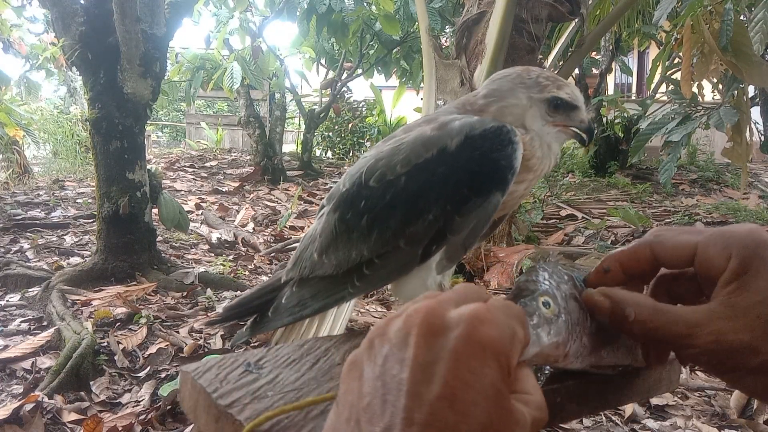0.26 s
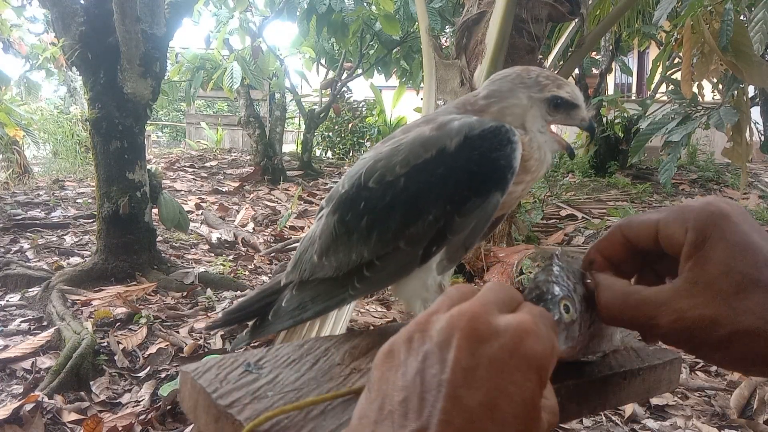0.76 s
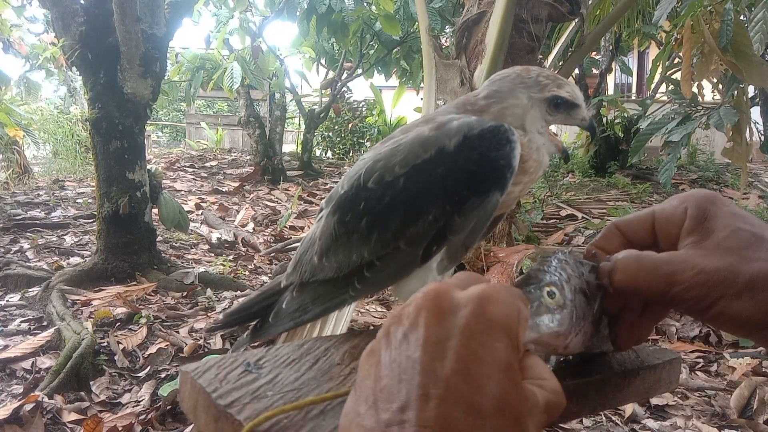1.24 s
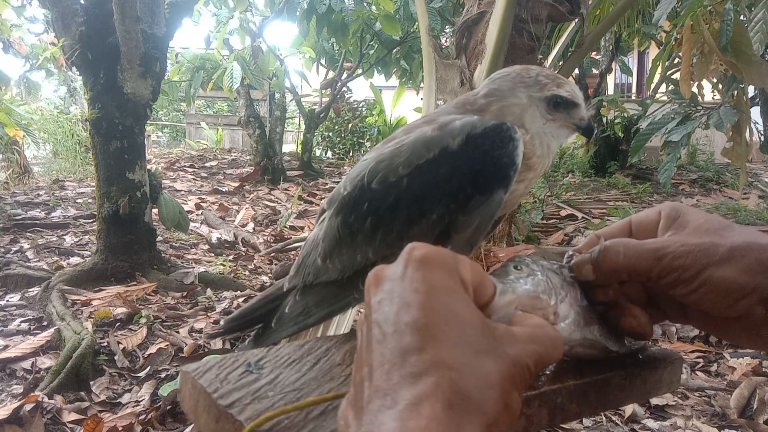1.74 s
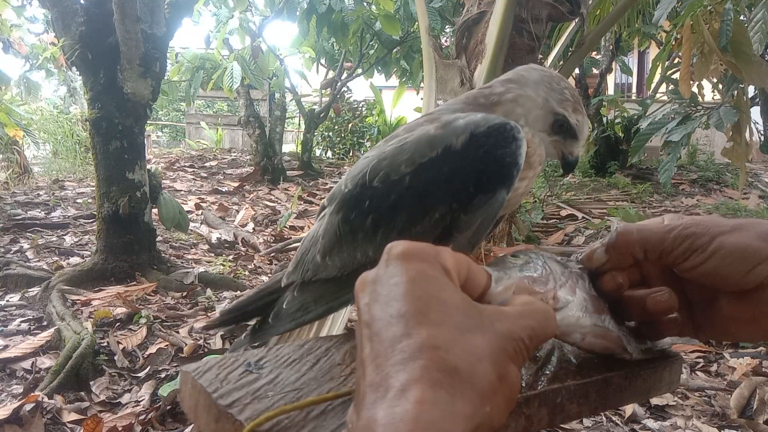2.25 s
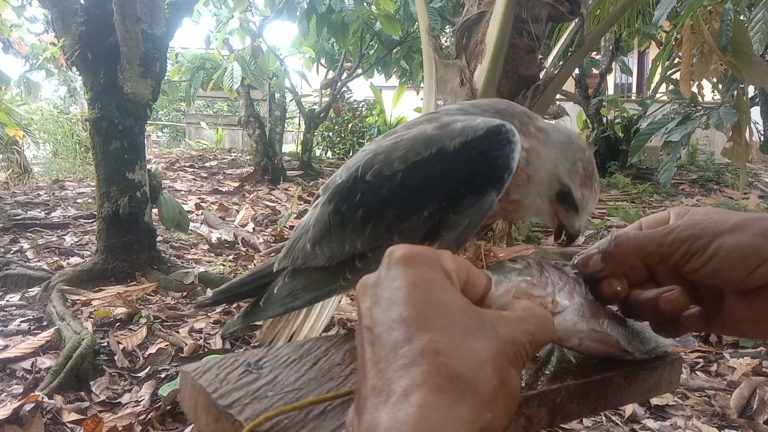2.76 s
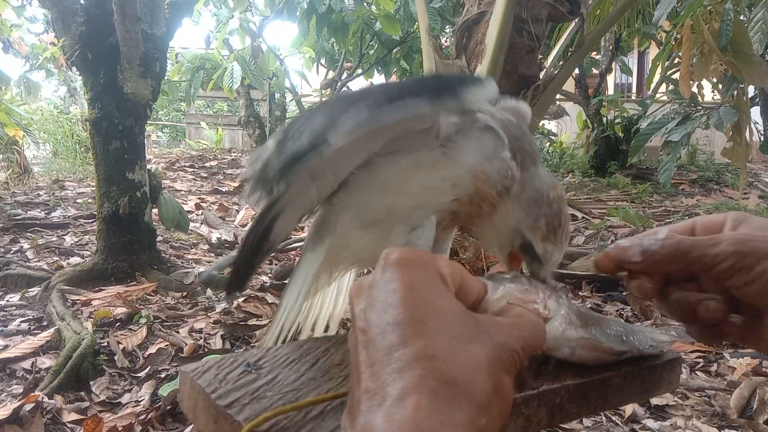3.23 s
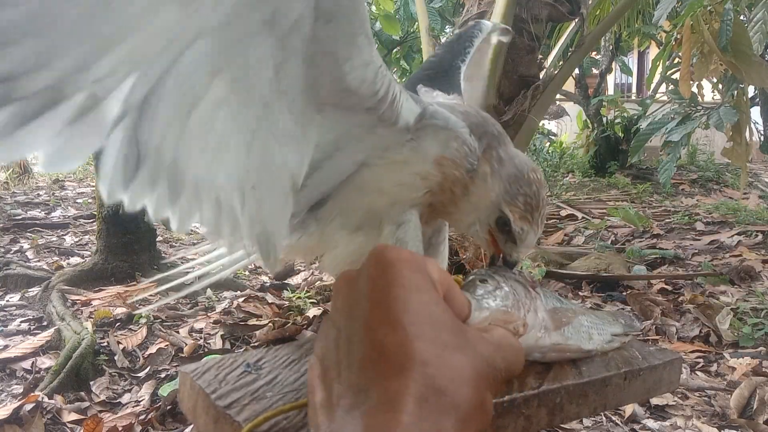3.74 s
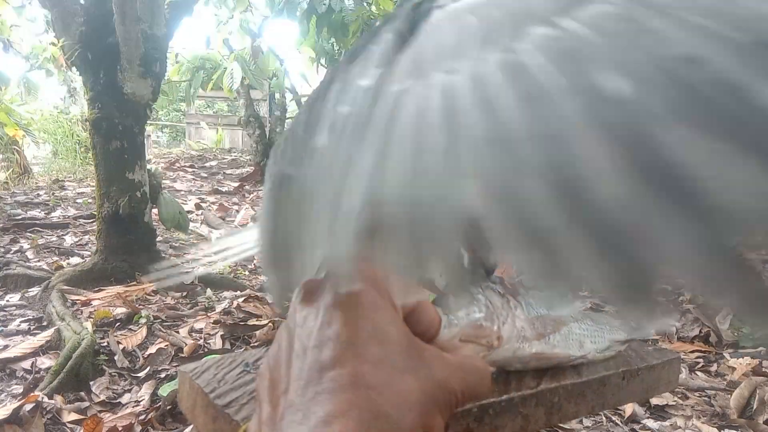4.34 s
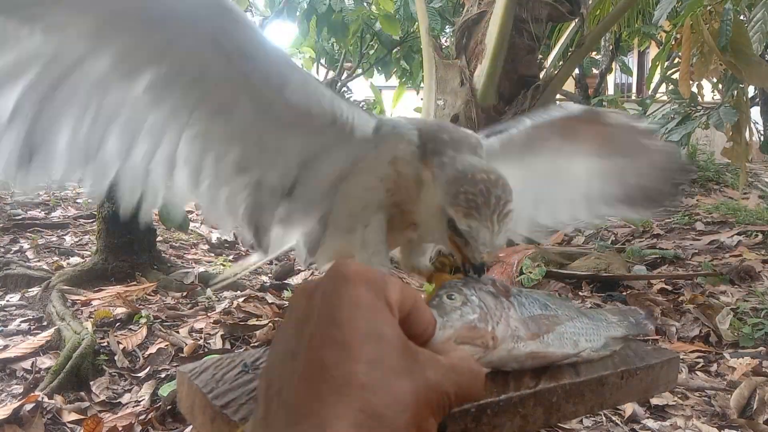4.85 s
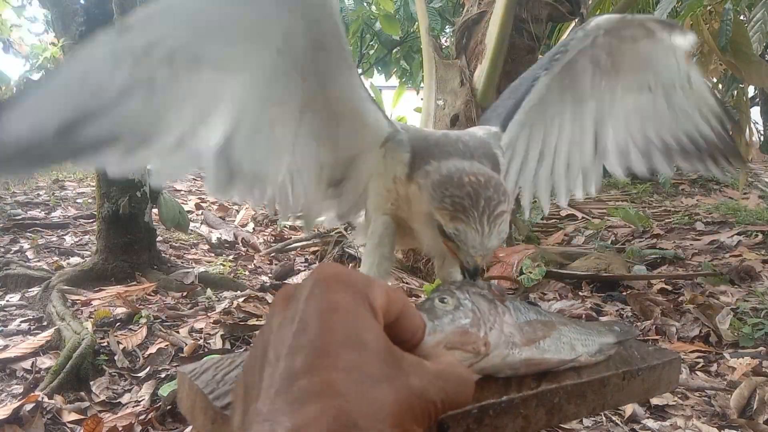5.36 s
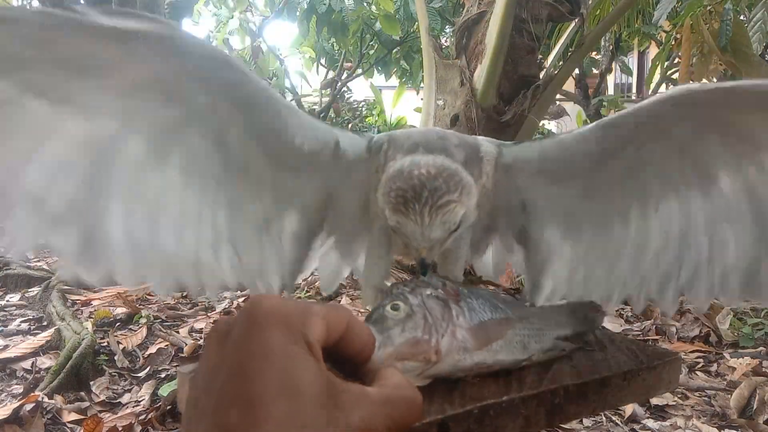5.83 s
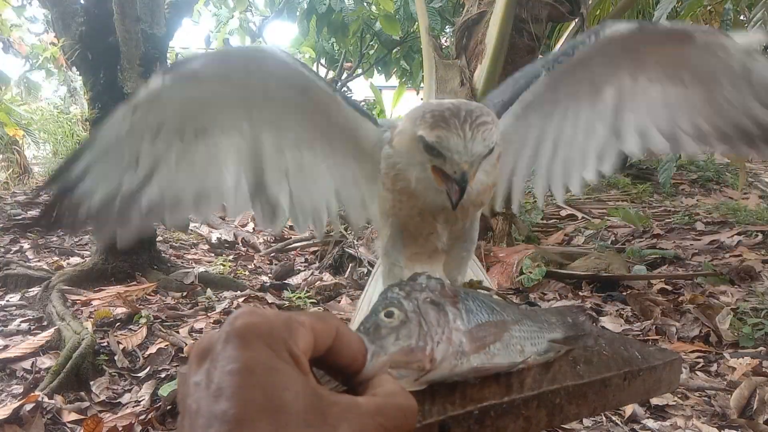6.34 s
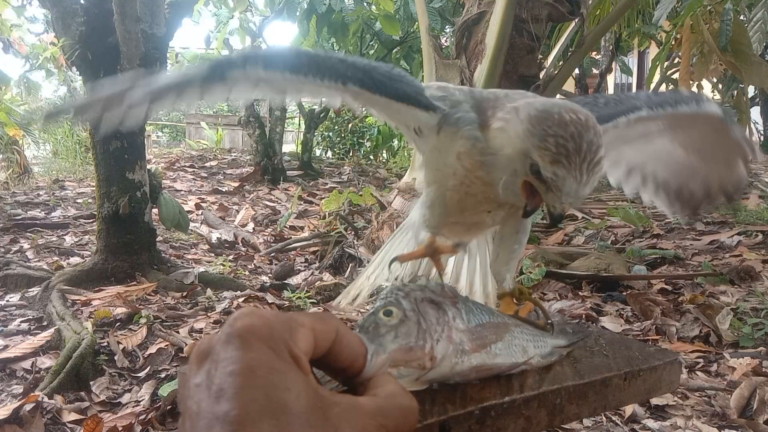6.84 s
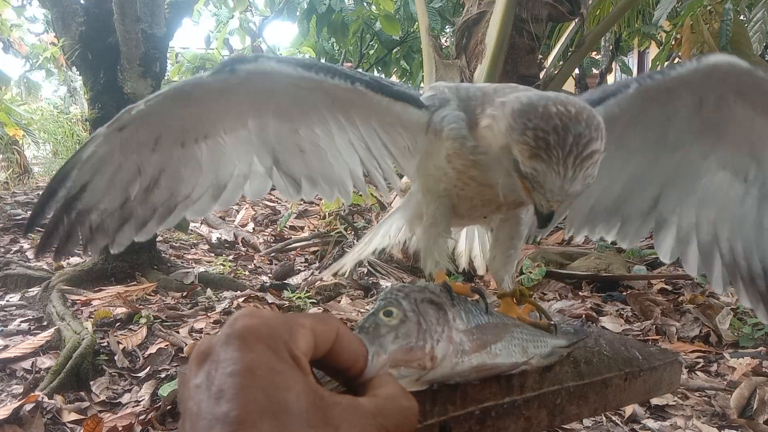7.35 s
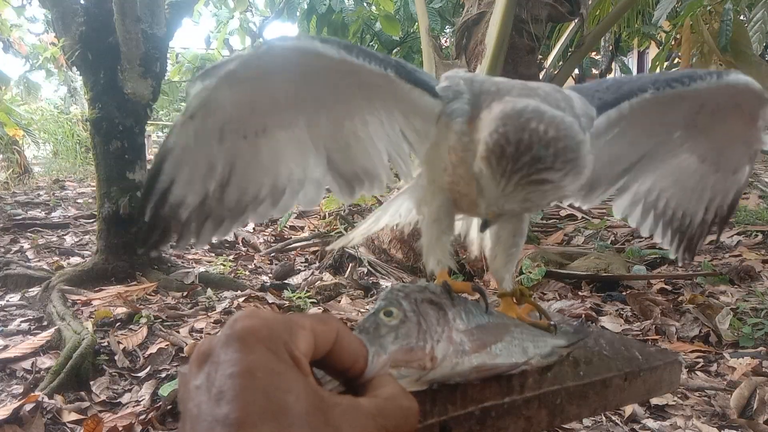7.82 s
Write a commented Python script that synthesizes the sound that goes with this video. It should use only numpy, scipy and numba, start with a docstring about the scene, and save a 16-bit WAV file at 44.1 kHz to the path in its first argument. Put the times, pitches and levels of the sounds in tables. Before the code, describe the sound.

A young bird of prey gives four long, shrill, rasping screams close by, over a faint fading engine and insects in a garden.

```python
"""Four long, rasping screams of a young bird of prey, a metre from a phone in a garden.
Uneven slaps and turbulence in its syrinx ring throat and beak resonances; thin wavering tones
break through. Behind it an idling engine dies away, a rumble, a broad hiss and insects swell
and fade, and a vehicle draws near at the end."""
import sys
import numpy as np
from scipy import signal
from scipy.fft import rfft, irfft
from scipy.io import wavfile
from scipy.ndimage import uniform_filter1d, minimum_filter1d
from numba import njit

SR = 44100
rng = np.random.default_rng(int(sys.argv[2]) if len(sys.argv) > 2 else 0)


def to_wav(sig):
    """Store sig (one row per channel, or 1-D mono) as 16-bit WAV at the path in sys.argv[1].

    Samples outside -1..1 are clipped; the rate is SR.
    """
    pcm = np.clip(np.atleast_2d(sig), -1, 1) * 32767
    pcm = np.round(pcm).astype(np.int16)
    wavfile.write(sys.argv[1], SR, pcm.T)  # frames by channels


N = 356636
TIME_S = np.arange(N) / SR

# course shared by rumble and engine: (time [s], level [dB])
RUMBLE_LEVEL = [(0.0, -42.5), (0.3, -40.5), (0.7, -50.5), (1.64, -46.5), (1.77, -37), (2.46, -38),
                (2.9, -48), (3.5, -54.5), (4.2, -53.5), (4.35, -66), (6.5, -68), (7.2, -62)]


def undb(db):
    return 10 ** (np.asarray(db) / 20)


def unit(x):
    return x / np.sqrt(np.mean(x ** 2))


def bump(at_s, width_s):
    return np.exp(-((TIME_S - at_s) / width_s) ** 2)


def curves(rows):
    """Columns interpolated over the first (time [s]), one value a sample."""
    times_s, *columns = np.transpose(rows)
    return [np.interp(TIME_S, times_s, column) for column in columns]


def walk(rate_hz):
    """Random steps, smoothed; RMS 1."""
    hold = int(SR / rate_hz)
    steps = np.repeat(rng.standard_normal(N // hold + 1), hold)
    return unit(uniform_filter1d(uniform_filter1d(steps, hold), hold)[:N])


@njit
def bandpass(x, hz, width_hz):
    """State-variable filter with moving centre and width; gain 1 at the centre."""
    y, band, low = np.empty(len(x)), 0., 0.
    for i in range(len(x)):
        g, damping = np.tan(np.pi * hz[i] / SR), width_hz[i] / hz[i]
        v = (band + g * (x[i] - low)) / (1 + g * (g + damping))
        band, low, y[i] = 2 * v - band, low + 2 * g * v, damping * v
    return y


def resonance(x, hz, width_hz, stages=2):
    """Cascaded band-passes, levelled to RMS 1 over 1/30 s."""
    for _ in range(stages):
        x = bandpass(x, hz * np.ones(N), width_hz * np.ones(N))
    return x / np.sqrt(uniform_filter1d(x ** 2, SR // 30) + 1e-9)


def coloured_noise(spectrum, flicker_db):
    """Flickering noise shaped by (frequency [Hz], level [dB]) points; RMS 1."""
    hz, db = np.transpose(spectrum)
    bins_hz = np.arange(N // 2 + 1) * SR / N + 1
    gain = undb(np.interp(np.log(bins_hz), np.log(hz), db))
    noise = irfft(rfft(rng.standard_normal(N)) * gain, N)
    return unit(noise * undb(flicker_db * walk(12)))


def syrinx(rate_hz, slap_share):
    """Uneven membrane slaps, each with a decaying gush of turbulence."""
    cycles = np.cumsum(rate_hz * np.clip(1 + .3 * walk(500), .1, 3)) / SR
    slaps = np.diff(np.floor(cycles), prepend=0) * undb(.4 * rng.standard_normal(N))
    gush = undb(-8 * (cycles % 1)) * rng.standard_normal(N)
    return undb(walk(70)) * (np.sqrt(slap_share) * unit(slaps) + np.sqrt(1 - slap_share) * unit(gush))


def rasp(beak_hz=4684, attack_s=.01, release_s=.024, snap_s=.018, snap_depth=.22, drift_per_db=.015):
    """The syrinx rings throat, beak and chest; resonances drop as the throat snaps shut."""
    # per call: (time [s], low resonance [Hz], throat resonance [Hz], throat level [dB],
    # low re throat [dB], brightness [dB])
    calls = [
        [(0.0, 1090, 2850, -36, 7.5, 17), (0.17, 1240, 2830, -28.5, 9, 12), (0.29, 1220, 2700, -29.5, 8.5, 17),
         (0.36, 1450, 2700, -14.5, -5, -2), (0.45, 1560, 3000, -11, -12.5, -4),
         (0.63, 1590, 3180, -13.5, -14.5, 1.5), (1.0, 1650, 3250, -13.5, -17.5, -1.5),
         (1.41, 1790, 3350, -15, -16, 1.5), (1.655, 1770, 3360, -17, -15, 5)],
        [(2.32, 1120, 3170, -45, 18, 1), (2.55, 1445, 3000, -30, 16.5, 19), (2.7, 1770, 3270, -16.5, -5, -6),
         (2.85, 1670, 3070, -21, -1.5, 0), (2.98, 1620, 3670, -16.5, -15.5, -30),
         (3.13, 1610, 2983, -24, -5.5, 8), (3.29, 1920, 3630, -19, -8, 0), (3.39, 1700, 3310, -27.5, -11.5, 3),
         (3.65, 2000, 2700, -25, -8.5, 12.5), (3.965, 2120, 3070, -17.5, -6.5, 7.5)],
        [(4.435, 1790, 3160, -24.5, -11, -21), (4.53, 1760, 3400, -21.5, -9.5, -11),
         (4.66, 2210, 2970, -16.5, -11.5, -11), (5.1, 2320, 2780, -20.5, -12.5, -2.5),
         (5.392, 2120, 2830, -22, -7.5, -0.5)],
        [(5.935, 1560, 2880, -20.5, -7.5, -1.5), (6.03, 1460, 2790, -20, -5, 2),
         (6.3, 2000, 3540, -17.5, -10.5, 5.5), (6.47, 1650, 3430, -17, -12.5, 5.5),
         (6.66, 2090, 4210, -17.5, -12.5, 2.5), (6.82, 1950, 4200, -15, -15.5, 0),
         (7.125, 2000, 4140, -12.5, -23.5, -10.5)],
    ]
    # per call: (slap rate [Hz], slap share [0-1], patchiness [dB],
    # widths of low, throat, beak, upper beak [Hz])
    textures = [(440, .7, .8, 1000, 1150, 1300, 1900), (400, .45, 2, 500, 900, 1450, 1900),
                (380, .3, 2.5, 1000, 1500, 1300, 1500), (600, .55, 1.4, 750, 1250, 1300, 1000)]
    # per call: (upper beak [Hz], beak, upper beak, air re throat [dB], chest re low [dB])
    colours = [(5770, -22.5, -11.5, -35.5, -18.5), (5300, -7.5, -9, -40.5, -18),
               (6090, -1.5, -1.5, -20, -17), (5790, -2, -2, -27, -15)]
    # brief beak boosts: (time [s], beak [dB], upper beak [dB], width [s])
    flares = [(2.98, 11, -28, 0.13), (3.285, 7, 8.5, 0.052), (3.89, 4, 4.5, 0.23), (5.988, 1.5, 1, 0.057)]
    # breath bands: (centre [Hz], width [Hz], level [dB])
    air_bands = [(8600, 2900, -22.5), (12690, 6400, 22.5)]
    low_hz, throat_hz, throat_db, low_db, bright_db = curves(np.concatenate(calls))
    held = [(call[end][0], *texture, *colour)
            for call, texture, colour in zip(calls, textures, colours) for end in (0, -1)]
    rate_hz, share, patchy_db, *widths_hz, upper_hz, beak_db, upper_db, air_db, chest_db = curves(held)
    flare_db = sum(np.outer(db, bump(at_s, width_s)) for at_s, *db, width_s in flares)
    beak_db += .1 * bright_db + flare_db[0]
    upper_db += .54 * bright_db + flare_db[1]
    centres_hz, levels_db = (low_hz, throat_hz, beak_hz, upper_hz), (low_db, 0, beak_db, upper_db)
    snap = 1 - snap_depth * sum(np.exp(-np.abs(TIME_S - call[-1][0]) / snap_s) for call in calls)
    source = syrinx(rate_hz, share)
    voice = 0
    for hz, width_hz, db in zip(centres_hz, widths_hz, levels_db):
        gain = undb(db + patchy_db * walk(14))
        drift = 1 + drift_per_db * patchy_db * walk(10)
        voice += gain * resonance(source, hz * snap * drift, width_hz, stages=3)
    voice += undb(low_db + chest_db) * resonance(source, hz=1037, width_hz=590, stages=3)
    air = sum(undb(db) * resonance(source, hz, width_hz) for hz, width_hz, db in air_bands)
    voice += undb(air_db + bright_db) * unit(air)
    gate = sum(np.minimum((TIME_S - call[0][0]) / attack_s, (call[-1][0] - TIME_S) / release_s).clip(0, 1)
               for call in calls)
    return voice * undb(throat_db) * gate


def whistles():
    """Self-sustained syrinx tones; pitch and level shake, more so when rough."""
    # per tone: ((roughness [0-1], partials [dB]), rows of (time [s], pitch [Hz], level [dB],
    # overtone gain [dB]))
    tones = [ ((.6, [0, 0]), [(0.2, 1076, -44, -20), (0.3, 1250, -27, -14), (0.37, 1450, -30, 2),
             (0.45, 1570, -34, 8)]), ((0.43, [0, 0]), [(2.33, 966, -34, -22), (2.4, 1280, -39, 1),
             (2.48, 1304, -43, 0), (2.58, 1530, -27.5, -27), (2.65, 1720, -21.5, 0),
             (2.8, 1802, -27.5, 13.5), (2.89, 1663, -21, 1), (2.97, 1764, -28.5, 1), (3.1, 1765, -29.5, -3),
             (3.28, 1907, -24.5, 7), (3.33, 1860, -46, 6)]), ((.3, [0]), [(3.125, 2680, -32, 0),
             (3.165, 2700, -20, 0), (3.2, 2800, -26, 0)]), ((0.31, [0, 0]), [(3.29, 3810, -27, -27),
             (3.37, 3200, -20, -9.5), (3.47, 3106, -20, -10.5), (3.6, 3004, -22.5, -4.5),
             (3.65, 3090, -16.5, -12), (3.75, 3053, -25, -10), (3.8, 3053, -27.5, 4), (3.9, 3200, -15, -26),
             (3.96, 2970, -39.5, -3.5)]), ((.65, [-16, -4, -3, -8]), [(4.44, 1440, -21.5, 2),
             (4.47, 1490, -13.5, 5), (4.53, 1533, -16, 4.5), (4.63, 1556, -9, -3)]), ((0.32, [0, 0]),
             [(4.63, 3160, -16, -7), (4.67, 3020, -17, -6), (4.75, 3037, -12.5, -18),
             (4.9, 3060, -20.5, -6.5)]), ((.33, [0, 0]), [(4.915, 2892, -12.5, -10), (5.0, 2880, -13, -23),
             (5.13, 2990, -9.5, -26), (5.24, 2950, -20, -30), (5.3, 2810, -15, -26.5),
             (5.345, 2910, -9.5, -26), (5.375, 2900, -38.5, -15)]), ((.5, [0, 0]), [(5.945, 1178, -33, 11),
             (6.04, 1470, -35, 17), (6.115, 1680, -29, 10.5), (6.3, 2110, -50, 22), (6.38, 1844, -48, 15)]),
             ((.5, [0, 0]), [(6.46, 1548, -43, 14), (6.51, 1490, -26, 7), (6.55, 1763, -56, 17),
             (6.69, 2170, -32, -11), (6.75, 2070, -32, -7), (7.06, 2160, -30, 13), (7.125, 1803, -34, 3)]),
             ]
    slow_pitch, quick_pitch, slow_level, quick_level = walk(50), walk(500), walk(70), walk(350)
    out = 0
    for (roughness, partials_db), course in tones:
        hz, level_db, overtone_db = curves(course)
        cycles = np.cumsum(hz * (1 + .0035 * slow_pitch + .05 * roughness * quick_pitch)) / SR
        stumble = unit(undb(4 * slow_level + 4 * roughness * quick_level))
        gate = uniform_filter1d(1. * ((TIME_S >= course[0][0]) & (TIME_S < course[-1][0])), 400)
        partials = sum(undb(db + (k > 1) * overtone_db) * np.cos(2 * np.pi * k * cycles)
                       for k, db in enumerate(partials_db, 1))
        out += gate * stumble * undb(level_db) * partials
    return np.sqrt(2) * out


def puffs(sputter_s=.002):
    """Throat sputters before the syrinx catches, and one short high hiss."""
    # (onset [s], peak [dB])
    sputters = [(4.403, -41), (4.414, -29), (4.428, -29.5), (5.907, -30), (5.917, -22), (5.925, -22),
                (5.929, -17), (5.945, -16)]
    # (time [s], peak [dB], width [s])
    hisses = [(7.392, -25.5, 0.034)]
    air = rng.standard_normal(N)
    throat = unit(resonance(air, 1800, 1400) + resonance(air, 4850, 770) + resonance(air, 3800, 2800))
    sputter_gain = sum(undb(db) * bump(at_s + sputter_s, sputter_s) for at_s, db in sputters)
    hiss_gain = sum(undb(db) * bump(at_s, width_s) for at_s, db, width_s in hisses)
    return throat * sputter_gain + resonance(air, 5960, 1200) * hiss_gain


def garden_echo(x, t60_s=.2, level_db=-22):
    """Trunks and ground return a short, faint tail."""
    tail = rng.standard_normal(SR // 3) * undb(-60 * TIME_S[:SR // 3] / t60_s)
    return undb(level_db) * signal.fftconvolve(x, tail / np.sqrt(np.sum(tail ** 2)))[:N]


def engine(firing_hz=38.7, over_rumble_db=3.5, fade_at_s=2.67, fade_db_per_s=92.5):
    """Idling engine: multiples of the firing rate, each wavering in level; it dies away."""
    # (multiple of firing rate, level [dB])
    orders = [(1, -20.5), (2, -1), (3, -36), (4, 3.5), (5, -4.5), (6, -1.5), (7, -5), (8, -11), (9, -5.5),
              (10, -5.5), (11, -9.5)]
    rumble_db, = curves(RUMBLE_LEVEL)
    hum = sum(undb(db + 2 * walk(6.7)) * np.cos(2 * np.pi * (k * firing_hz * TIME_S + rng.random()))
              for k, db in orders)
    fade_db = fade_db_per_s * np.maximum(TIME_S - fade_at_s, 0)
    return unit(hum) * undb(rumble_db + over_rumble_db - fade_db)


def rumble(gust_s=.073):
    """Low noise that swells and fades; wing beats push soft gusts."""
    # (frequency [Hz], level [dB])
    spectrum = [(24, -49), (40, -12.5), (59, -9), (135, 0.5), (195, -3.5), (249, -8), (396, -8), (500, -32),
                (650, -59.5), (1100, -120)]
    # (time [s], peak [dB])
    gusts = [(5.93, -61.5), (6.16, -61)]
    level_db, = curves(RUMBLE_LEVEL)
    gain = undb(level_db) + sum(undb(db) * bump(at_s, gust_s) for at_s, db in gusts)
    return gain * coloured_noise(spectrum, flicker_db=2)


def vehicle(near_s=7.225, near_db=-42, rise_db_per_s=87, creep_db_per_s=12.5):
    """A vehicle draws near: low noise rises fast, then creeps up."""
    # (frequency [Hz], level [dB])
    spectrum = [(24, -51.5), (40, -36), (75, 3.5), (155, -12.5), (238, 4.5), (307, -7), (404, -10.5),
                (664, -6.5), (736, -10), (1300, -1), (1510, -28), (1700, -14), (2090, -28), (2400, -39),
                (3120, -45.5), (5280, -120)]
    since_s = TIME_S - near_s
    level_db = near_db + np.where(since_s < 0, rise_db_per_s, creep_db_per_s) * since_s
    return undb(level_db) * coloured_noise(spectrum, flicker_db=.99)


def broad_hiss(mid_db=-7):
    """Mid and high noise bands swell and fade together."""
    # (time [s], level [dB])
    course = [(1.68, -33), (1.75, -26), (2.14, -26.5), (2.3, -29), (4.0, -52.5), (4.33, -60.5), (5.42, -66),
              (5.9, -63), (7.16, -45), (7.45, -35.5), (8.09, -38)]
    # both: (frequency [Hz], level [dB])
    mid_spectrum = [(260, -30.5), (450, -8.5), (730, -10), (907, -2), (1230, -2), (1570, 0), (2400, -19),
                    (3120, -38.5), (5280, -120)]
    high_spectrum = [(1350, -28), (2300, -8), (2630, -7.5), (2900, -1.5), (3570, -4.5), (5490, -1),
                     (6600, -4), (9830, -26.5), (14300, -28.5), (15500, -28.5)]
    level_db, = curves(course)
    mid = undb(mid_db) * coloured_noise(mid_spectrum, flicker_db=.65)
    return undb(level_db) * (mid + coloured_noise(high_spectrum, flicker_db=1))


def insects():
    """Insect drone: two narrow, fluttering noise bands."""
    # (centre [Hz], width [Hz], level [dB])
    bands = [(5580, 200, 0), (6350, 260, -3)]
    # (time [s], level [dB])
    course = [(1.8, -80), (2.08, -30.5), (2.3, -54), (4.0, -56), (4.4, -59.5), (5.5, -70.5), (8.09, -72.5)]
    level_db, = curves(course)
    drone = sum(undb(db + 3.5 * walk(40)) * resonance(rng.standard_normal(N), hz, width_hz)
                for hz, width_hz, db in bands)
    return undb(level_db) * drone


def scene():
    bird = rasp() + whistles() + puffs()
    return (bird + garden_echo(bird) + insects() + rumble() + vehicle() + broad_hiss() + engine())[None]


def record(dry, low_hz=64.8, limit=.8, top_hz=15650):
    """The phone loses deep bass, limits peaks and cuts the top."""
    x = signal.sosfilt(signal.butter(2, low_hz, "high", fs=SR, output="sos"), dry)
    gain = minimum_filter1d(np.minimum(1, limit / (np.abs(x) + 1e-9)), size=90)
    x = x * uniform_filter1d(gain, size=45)
    return signal.sosfilt(signal.ellip(10, .2, 70, top_hz, fs=SR, output="sos"), x)


dry = scene()
out = record(dry)
to_wav(out)
```